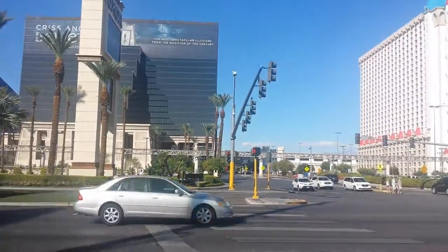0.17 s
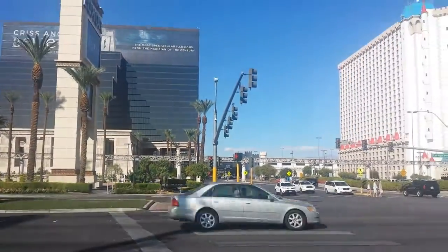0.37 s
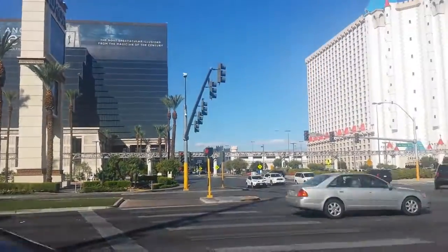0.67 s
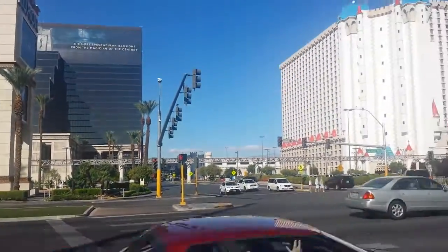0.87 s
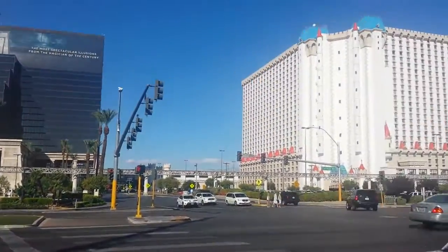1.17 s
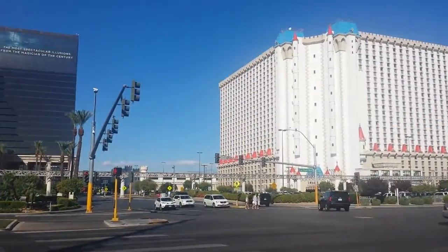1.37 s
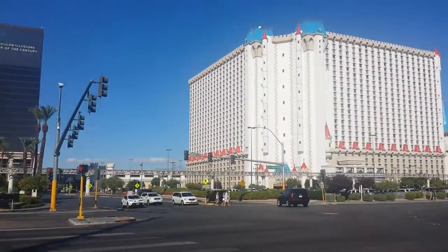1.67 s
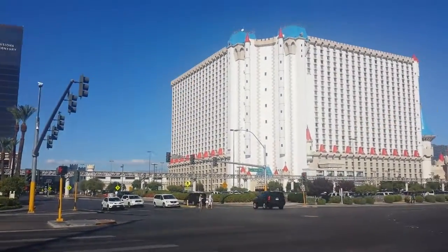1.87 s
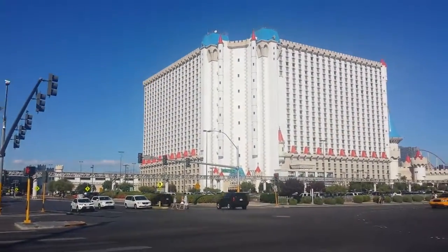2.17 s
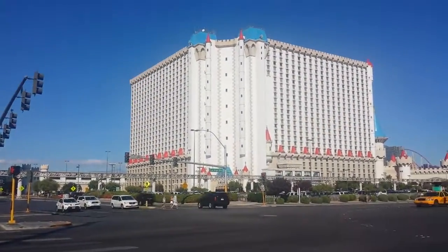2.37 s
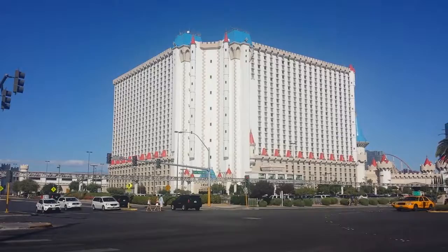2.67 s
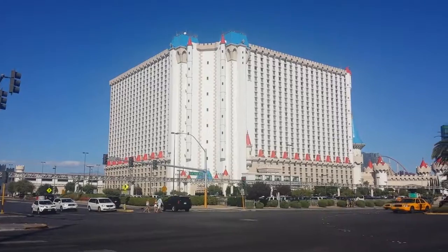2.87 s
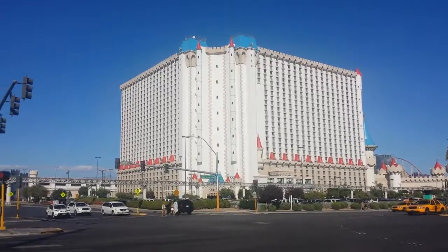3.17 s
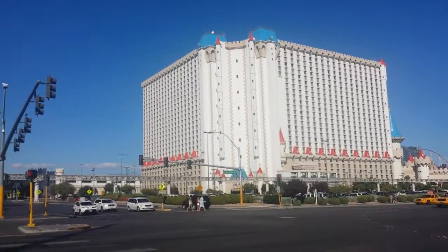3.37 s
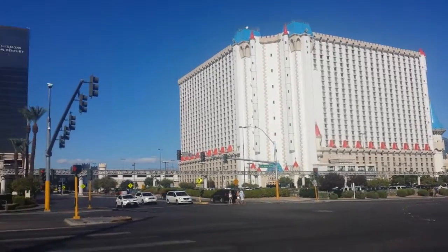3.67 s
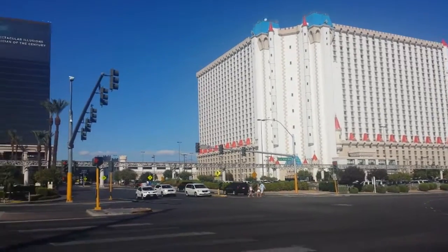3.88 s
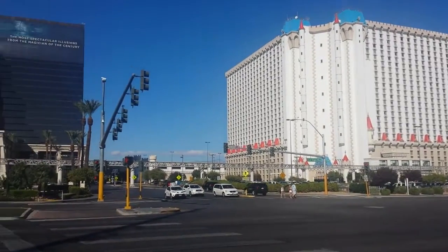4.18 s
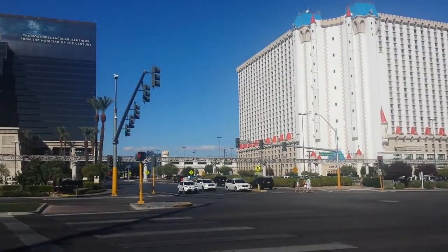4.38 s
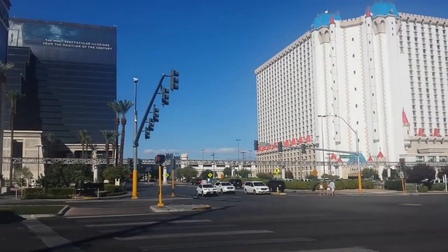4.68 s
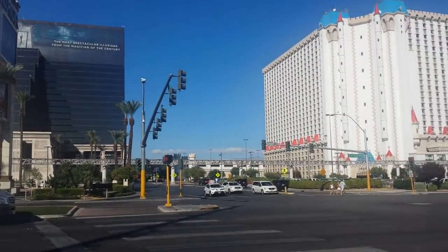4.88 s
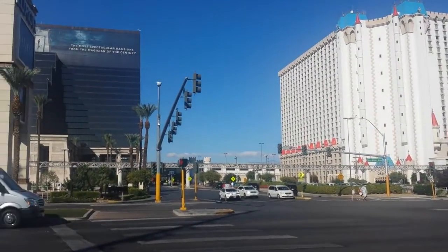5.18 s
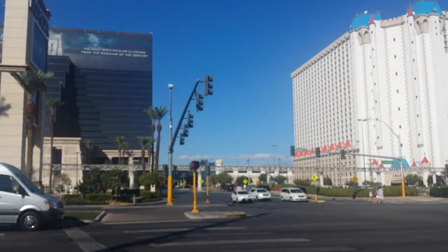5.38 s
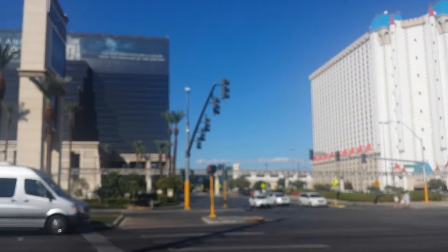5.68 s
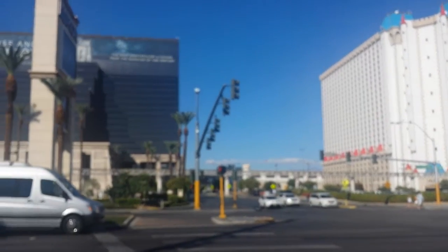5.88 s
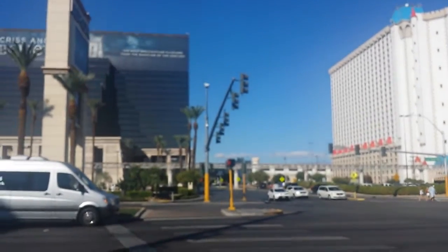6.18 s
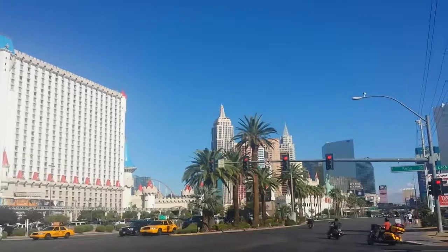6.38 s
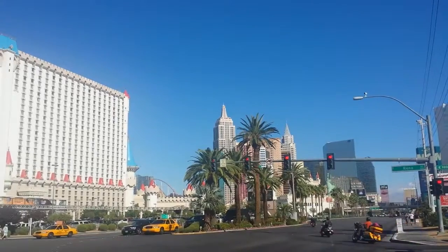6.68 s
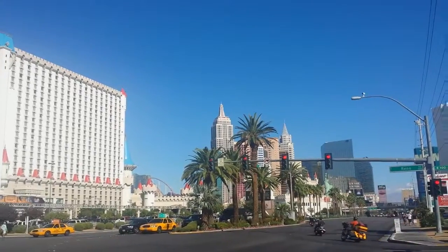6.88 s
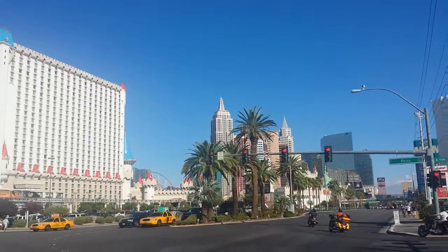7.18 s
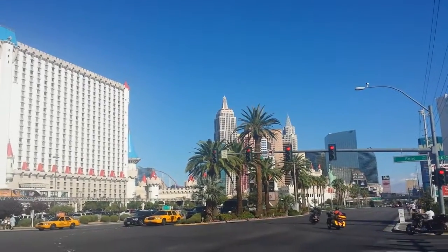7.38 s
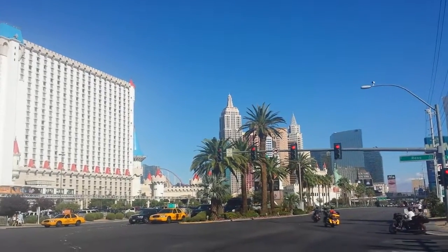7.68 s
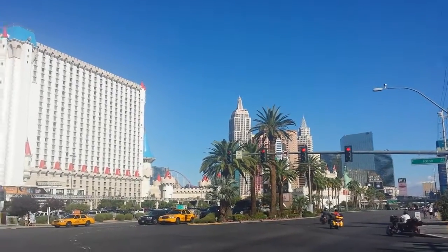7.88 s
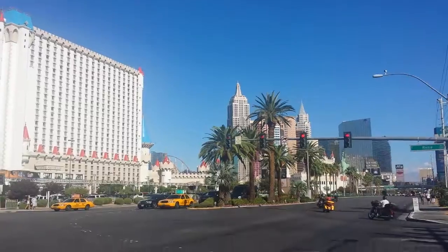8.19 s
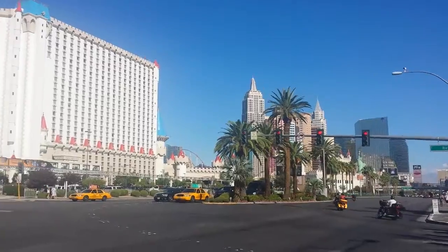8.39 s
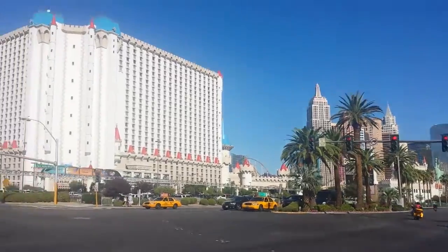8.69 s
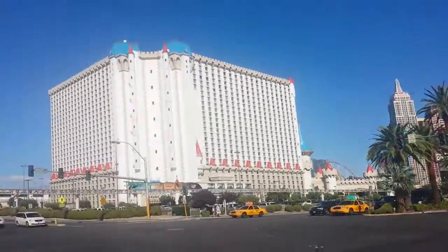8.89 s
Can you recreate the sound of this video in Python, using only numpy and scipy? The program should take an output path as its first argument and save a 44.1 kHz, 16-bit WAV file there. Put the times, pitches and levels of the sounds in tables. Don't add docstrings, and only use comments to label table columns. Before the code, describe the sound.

Kerbside stereo phone pickup, bright but without the highest treble. Close tyre rush swells and drops quickly, its bearing swinging across, with quick thuds over road joints. Distant multi-lane traffic remains under a faint high scrape, a low idling drone and piercing brakes that chirp and sag. After a sudden cut, lumpy twin-cylinder motorbikes dominate, popping and rattling in rapid succession, the last one growing loudest at the end.

```python
import sys
import numpy as np
from scipy import signal
from scipy.fft import rfft, irfft, next_fast_len
from scipy.io import wavfile
from scipy.ndimage import uniform_filter1d, map_coordinates

SR = 44100
rng = np.random.default_rng(int(sys.argv[2]) if len(sys.argv) > 2 else 0)


def dump_mix(stems):
    frames = np.atleast_2d(stems).T
    limited = np.clip(frames, -1, 1)
    pcm = np.round(limited * 32767).astype(np.int16)
    wavfile.write(sys.argv[1], SR, pcm)


def rack_gain(trim_db):
    fader = np.asarray(trim_db, float)
    return 10 ** (fader / 20)


N = 398663
TIME = np.arange(N) / SR
CUT_S = 6.243

# t/s, lag of the left port/ms
BEARING = [(0, 0.4), (.8, 0.34), (1.05, 0.0065), (1.3, -0.24), (3.6, -0.3)]
# t/s, peak
# level/dB, jet f/Hz
FIRST_BIKE_FIRINGS = [(6.2618, -13.5, 6410), (6.3152, -14.5, 5830), (6.345, -15, 6640),
                      (6.3681, -13.5, 5700), (6.4, -21, 7650), (6.4204, -25, 5750), (6.4514, -21, 7280),
                      (6.4716, -16, 5360), (6.5023, -23, 5400), (6.5237, -18, 5360), (6.5736, -18, 7950),
                      (6.606, -18, 7250), (6.626, -15, 7300), (6.6549, -21, 5830), (6.6609, -27, 7780),
                      (6.676, -20, 5330)]
SECOND_BIKE_FIRINGS = [(6.6764, -22, 5230), (6.7086, -21, 7380), (6.7741, -23, 5430), (6.7911, -18.5, 7500),
                       (6.826, -22, 7810), (6.8739, -19, 8000), (6.9088, -17.5, 5430), (6.9567, -18, 7970),
                       (6.9911, -17.5, 7700), (7.037, -17, 8000), (7.073, -26, 7680), (7.0733, -20, 7990),
                       (7.1186, -15, 8000), (7.1533, -17, 8140), (7.198, -22, 6160), (7.1992, -17.5, 7620),
                       (7.2331, -17.5, 7400), (7.279, -16, 8220), (7.3139, -16, 7880), (7.3495, -22, 5750),
                       (7.3588, -17, 8200), (7.3942, -19.5, 8030), (7.4406, -17, 7250), (7.475, -20, 6110),
                       (7.5209, -19, 8090), (7.5559, -18, 5590), (7.6003, -20, 7950), (7.6626, -22, 7510),
                       (7.6781, -22, 8300), (7.7075, -17, 5310), (7.7532, -18, 8200), (7.787, -19.5, 8100),
                       (7.8193, -23, 7420), (7.8302, -17, 8280), (7.8637, -19, 7480), (7.906, -17, 7840),
                       (7.9195, -16.5, 7560), (7.9614, -17, 5360), (7.9789, -24, 7420), (8.0098, -16, 7600),
                       (8.0508, -15, 5210), (8.0822, -24, 7740), (8.1082, -16, 7600), (8.148, -22, 7900),
                       (8.1999, -20, 4870), (8.2002, -19, 7700), (8.2243, -25, 8230), (8.2388, -19, 6430),
                       (8.263, -18, 8250), (8.2924, -16, 7500), (8.3308, -15.5, 7400)]
THIRD_BIKE_FIRINGS = [(8.3808, -15.5, 5730), (8.4017, -22, 8090), (8.4195, -17, 5600), (8.4684, -14, 5160),
                      (8.508, -21, 4500), (8.507, -17, 5920), (8.536, -21, 5530), (8.5569, -13, 6050),
                      (8.5932, -12.5, 6180), (8.6314, -19, 5750), (8.6402, -13.5, 6140),
                      (8.6696, -16, 7500), (8.6773, -14, 7340), (8.6971, -19, 5510), (8.725, -9, 6940),
                      (8.7622, -13, 6900), (8.7987, -21, 5540), (8.8073, -13.5, 5000), (8.8278, -22, 5680),
                      (8.843, -14.5, 6600), (8.887, -13.5, 7440), (8.921, -12, 7300), (8.966, -12.5, 7450),
                      (8.9978, -13, 7270)]


def unit(x):
    return x / np.sqrt(np.mean(x ** 2) + 1e-20)


def along(points, hz):
    f, v = np.transpose(points)
    return np.interp(np.log(hz + 1), np.log(f + 1), v)


def curves(rows):
    s, *cols = np.transpose(rows)
    return [np.interp(TIME, s, c) for c in cols]


def during(rows, fade):
    return np.clip(np.minimum(TIME - rows[0][0], rows[-1][0] - TIME) / fade, 0, 1)


def wobble(rate):
    return map_coordinates(rng.standard_normal(int(N * rate / SR) + 4), [TIME * rate])


def filtered(x, response):
    m = next_fast_len(N + 8192)
    return irfft(rfft(x, m) * response(np.fft.rfftfreq(m, 1 / SR)), m)[..., :N]


def resonances(modes):
    def response(f):
        return sum((-1) ** k * rack_gain(db) * 1j * f * width / (centre * centre - f * f + 1j * f * width)
                   for k, (centre, width, db) in enumerate(modes))
    return response


def ports(x, lag_ms):
    half = np.asarray(lag_ms) * SR / 2000
    return np.array([map_coordinates(x, [np.arange(N) + side * half], order=3) for side in (-1, 1)])


def rush(spectrum, lag_ms, aimed, patchy_db):
    z = signal.stft(rng.standard_normal((3, N)), nperseg=512)[2]
    field = rng.standard_normal(z.shape[1:])
    field = uniform_filter1d(uniform_filter1d(field, size=6, axis=0), size=12, axis=1)
    noise = signal.istft(z * rack_gain(patchy_db * unit(field)), nperseg=512)[1][:, :N]
    port_gap_ms = 0.25

    def response(hz):
        turn = np.arccos(np.sinc(2 * hz * port_gap_ms / 1000)) / 2
        return rack_gain(along(spectrum, hz)) * [hz * 0 + 1, np.cos(turn), np.sin(turn)]

    beam, mid, side = filtered(noise, response)
    aimed = np.clip(aimed, 0, 1)
    around = np.array([mid + side, mid - side])
    return unit(np.sqrt(aimed) * ports(beam, lag_ms) + np.sqrt(1 - aimed) * around)


def tone(hz, orders, unsteady_hz, flutter_db, beads=25):
    phase = 2 * np.pi * np.cumsum(hz + unsteady_hz * wobble(60)) / SR
    return sum(np.sqrt(2) * rack_gain(db + flutter_db * wobble(beads)) * np.sin(k * phase) for k, db in orders)


def passing(closest, coming, going, fall):
    return (1 + ((TIME - closest) / np.where(TIME < closest, coming, going)) ** 2) ** (-fall / 2)


def passing_cars():
    # closest t/s, coming/s, going/s, tyre level/dB, tread hiss level/dB
    cars = [
        (.6, 0.56, 0.21, -18, -24.5),
        (.82, 0.075, 0.1, -15, -25),
        (1.82, 0.99, .6, -25.5, -39.5),
    ]
    # f/Hz, level/dB per Hz
    tyre_colours = [
        [(180, -28), (300, -6.5), (573, -4), (676, 1.5), (1150, -6.5), (1590, -1), (2180, -9.5), (2570, -21.5),
         (3500, -18.5), (4550, -53), (7700, -120)],
        [(180, -41), (300, -40), (528, -11.5), (683, -0.5), (883, 3.5), (1270, -7), (1570, -20), (2030, -7.5),
         (2680, -33.5), (3060, -17), (3500, -35), (4550, -22), (7700, -120)],
    ]
    # f/Hz, level/dB per Hz
    tread_colour = [(1650, -6), (2800, 1.5), (3510, -3.5), (4950, -5.5), (6780, 5), (9170, -8.5),
                    (11000, -32), (12400, -38), (14200, -30), (15000, -38)]
    # t/s, firing f/Hz, level/dB
    exhaust = [(0, 89, -48), (.07, 85.9, -30), (.4, 86.8, -28), (.76, 98.9, -27), (.86, 99.9, -23.5),
               (1.05, 104.3, -20.5), (1.55, 105.8, -23), (1.7, 103.4, -29), (2.2, 101.8, -31)]
    # multiple of firing f, level/dB
    exhaust_orders = [(1, 0), (1.5, -12), (2, -9), (2.25, -8), (3, -15)]
    tyre_fall, tread_fall, gone_s = 0.85, 1.7, 4.44

    first, *others = (rack_gain(db) * passing(*move, tyre_fall) for *move, db, _ in cars)
    tread = np.sqrt(sum((rack_gain(db) * passing(*move, tread_fall)) ** 2 for *move, _, db in cars))
    lag_ms, = curves(BEARING)
    bumps = wobble(34.8)
    roar = first * rush(tyre_colours[0], lag_ms=0.4, aimed=0.51, patchy_db=1.0)
    near_roar = rush(tyre_colours[1], lag_ms, aimed=0.81, patchy_db=2.0)
    roar += np.hypot(*others) * rack_gain(0.59 * bumps) * near_roar
    hiss = tread * rack_gain(0.8 * bumps) * rush(tread_colour, lag_ms, aimed=0.4, patchy_db=0.9)
    hz, db = curves(exhaust)
    note = tone(hz, exhaust_orders, unsteady_hz=0.93, flutter_db=0.6)
    note = during(exhaust, 0.038) * rack_gain(db - 1.5) * note
    return np.clip(gone_s - TIME, 0, 1) * (roar + hiss) + ports(note, lag_ms)


def grooves():
    # closest t/s, coming/s, going/s, level/dB, f/Hz, width/Hz
    flashes = [
        (.73, 0.24, 0.11, -28.5, 2240, 465),
        (1.046, 0.31, 0.082, -25, 1590, 450),
        (0.785, 0.1, 0.1, -24, 820, 210),
        (0.93, 0.24, 0.19, -38.5, 10700, 2000),
        (0.95, 0.15, 0.11, -25.5, 6660, 1300),
        (3.6, 0.028, .03, -49, 6100, 1100),
        (4.29, 0.09, 0.041, -43, 5200, 1500),
    ]
    lag_ms, = curves(BEARING)

    def band(hz, width):
        response = resonances([(hz, width, 0)])
        return unit(filtered(rng.standard_normal(N), lambda f: response(f) ** 2))

    return sum(ports(rack_gain(db) * passing(*move, 1.6) * band(hz, width), lag_ms)
               for *move, db, hz, width in flashes)


def joints():
    # t/s, peak level/dB
    slaps = [(0.79, 3), (0.812, 2), (0.851, -5), (0.905, -18), (0.945, -6), (0.986, 0.5), (1.059, -15),
             (1.11, -1), (1.408, -4)]
    # f/Hz, width/Hz, level/dB
    cavity = [(830, 140, 8.5), (2030, 820, -5)]
    out, t = np.zeros(N), np.arange(900) / SR
    for s, db in slaps:
        burst = 1.1 * rng.standard_normal(len(t)) - 0.98 * np.cos(2 * np.pi * 900 * t)
        out[round(s * SR):][:len(t)] += rack_gain(db - 60 * t / 0.0062) * burst
    rung = filtered(out, lambda f: resonances(cavity)(f) / (1 + 1j * f / 4000) ** 2)
    return ports(rung, curves(BEARING)[0])


def motorbikes():
    # t/s, engine cycle f/Hz
    cranks = [
        [(6.19, 18.769), (6.95, 20.746)],
        [(6.18, 10.804), (6.9, 12.312), (7.5, 12.62), (8, 13.6), (8.5, 14.3), (9.06, 15)],
        [(7.5, 9.295), (9.13, 12.991)],
    ]
    starts = [-.02, -.032, -.101]
    # t/s, level/dB
    throttles = [
        [(6.2, -30.5), (6.45, -31), (6.7, -38), (6.95, -23)],
        [(6.2, -36), (6.6, -33.5), (7.2, -38), (7.5, -31), (8, -31.5), (8.4, -31), (8.7, -44), (9.05, -36)],
        [(7.55, -60), (7.9, -38), (8.2, -37), (8.45, -32.5), (8.57, -28), (8.75, -29.5), (9.1, -30.5)],
    ]
    # thump level/dB at a nearness of -31.5 dB, growth/dB per dB
    thumps = [(-22, 1), (-22, 1), (-26, 2.5)]
    pipes = [
        [3, 4, 5, 6, 7, 9, 10, 12],
        [5, 6, 7, 9, 12, 16, 19, 21, 23, 28, 37],
        [5, 7, 9, 10, 12, 16, 18, 25, 26],
    ]
    pipe_levels = [
        [-8, -11, 10, -6, 9, -15, -21, -4],
        [-4, -5, 0, 6, -1, 3, -6, 2, -12, -10, -11],
        [0, 8, 7, -16, -12, -3, -6, -3, -9],
    ]
    # f/Hz, width/Hz, level/dB
    mouths = [
        [(1290, 520, -17), (2900, 430, -2), (5500, 430, 5), (7550, 1440, -1.5)],
        [(1280, 420, -9), (2760, 1100, 2), (5530, 800, 3), (8030, 970, 1)],
        [(1920, 240, 2), (2960, 2500, -1), (5570, 1700, 1.5), (7780, 1060, 4)],
    ]
    lags = [-0.228, -0.13, -0.17]
    blast_levels = [-7, -3.5, -5.5]
    jet_levels = [-5, -5.5, -7]
    # delay/s, level/dB
    walls = [(.0098, -16), (.021, -38), (.034, -9), (.055, -10.5)]
    firing_tables = (FIRST_BIKE_FIRINGS, SECOND_BIKE_FIRINGS, THIRD_BIKE_FIRINGS)

    out, t = np.zeros((2, N)), np.arange(700) / SR
    shape = (1 - np.exp(-t / 0.0009)) * np.exp(-t / 0.0022)
    for crank, start, throttle, (thump_db, growth), orders, orders_db, mouth, lag_ms, firings, blast_db, jet_db in zip(
            cranks, starts, throttles, thumps, pipes, pipe_levels, mouths, lags,
            firing_tables, blast_levels, jet_levels):
        thump = pipe_thump(crank, start, zip(orders, orders_db))
        sounding = np.sqrt(N / SR / (crank[-1][0] - crank[0][0]))
        near_db, = curves(throttle)
        thump = rack_gain(thump_db + growth * (near_db + 31.5)) * unit(thump) / sounding
        crack = gas_blasts(firings, blast_db, shape, mouth)
        for _ in range(2):
            crack = crack + rack_gain(jet_db) * jets(firings, shape)
        out += ports(thump + crack, lag_ms)
        for k, (delay, db) in enumerate(walls):
            out += rack_gain(db) * ports(np.roll(crack, round(delay * SR)), (-1) ** k * 0.317)
    return out * (TIME >= CUT_S)


def pipe_thump(crank, start, pipe):
    second_cylinder = 0.4375
    cycles = start + np.cumsum(curves(crank)[0] * (during(crank, 1) > 0)) / SR
    thump = np.zeros(N)
    for k, db in pipe:
        phase = np.angle(1 + np.exp(-2j * np.pi * k * second_cylinder))
        thump -= rack_gain(db + 1.5 * wobble(12)) * np.cos(2 * np.pi * k * (cycles + 0.016) + phase)
    return thump * during(crank, 0.12)


def gas_blasts(firings, blast_db, shape, mouth):
    s, peak_db, _ = np.transpose(firings)
    puffs = np.bincount(np.round(s * SR).astype(int), rack_gain(peak_db + blast_db), minlength=N)[:N]
    blast = signal.fftconvolve(puffs, shape)[:N]
    gas = rng.standard_normal(N)
    crack = filtered(blast * gas, lambda f: resonances(mouth)(f) / (1 + 1j * f / 12000))
    return crack / np.std(filtered(gas, resonances(mouth))) * 2


def jets(firings, shape):
    width_hz = 990
    s, db, hz = np.transpose(firings)[..., None]
    t = np.arange(len(shape)) / SR
    band = np.exp(-np.pi * width_hz * t) * t * np.sin(2 * np.pi * hz * t)
    gas = rng.standard_normal((len(s), len(t))) * shape
    jet = signal.fftconvolve(gas, band, axes=1)[:, :len(t)]
    jet *= rack_gain(db) / np.abs(jet).max(axis=1, keepdims=True)
    at = np.round(s * SR).astype(int) + np.arange(len(t))
    return np.bincount(at.ravel(), jet.ravel(), minlength=N)[:N]


def knocks():
    # t/s, peak level/dB, f/Hz
    rattles = [(6.2798, -12, 3140), (6.3401, -23, 2670), (6.401, -21, 2480), (6.5157, -20, 2900),
               (6.5731, -18.5, 3220), (6.7073, -24, 2830), (6.7417, -15, 2600), (6.7971, -11, 2760),
               (6.828, -24, 2520), (6.852, -19, 2780), (6.8814, -22, 2340), (6.9582, -19, 2360),
               (7.1538, -23, 2240), (7.1997, -23, 2600), (7.2795, -24, 3010), (7.3119, -23, 2370),
               (7.3583, -21, 2500), (7.3942, -20, 3290), (7.4406, -12, 2870), (7.5209, -22, 2620),
               (7.5539, -25, 2180), (7.6003, -22, 3370), (7.6531, -18, 2700), (7.7125, -23, 2800),
               (7.728, -10, 2750), (7.7734, -22, 2100), (7.8627, -23, 2360), (7.8791, -13, 2650),
               (7.947, -17, 2670), (8.0058, -16, 2290), (8.1076, -20, 2620), (8.359, -18, 2080),
               (8.3825, -24, 2600), (8.5077, -20, 2220), (8.8868, -25, 2140), (8.9228, -23, 3130),
               (8.9657, -19.5, 2250), (8.9986, -16, 3170)]
    # t/s, peak level/dB, f/Hz
    clunks = [(6.5282, -24, 1340), (6.648, -21, 1290), (6.8265, -22, 1330), (7.038, -15, 1280),
              (7.1154, -22, 1620), (7.153, -19, 1280), (7.316, -17, 1280), (7.44, -22, 1070),
              (7.5559, -24, 1080), (7.5993, -23, 1200), (7.707, -20, 1560), (7.7945, -15, 1620),
              (7.8367, -16, 1800), (7.8607, -23, 1130), (7.8801, -22, 1150), (8.67, -18, 1470)]
    # t/s, peak level/dB, f/Hz
    clacks = [
        (5.596, -21, 1400),
        (5.761, -16, 2300),
    ]
    out, t = np.zeros(N + 900), np.arange(900) / SR
    for s, db, hz in [*rattles, *clunks, *clacks]:
        ring = np.sin(2 * np.pi * hz * t) + 0.5 * rng.standard_normal(len(t)) * rack_gain(-60 * t / 0.006)
        swell = np.exp(-t * hz / 4) * (1 - np.exp(-t / 0.00048))
        out[round(s * SR):][:len(t)] += rack_gain(db + 0.5) * swell * ring
    return ports(filtered(out[:N], lambda f: 1 / (1 + 1j * f / 5000) ** 2), lag_ms=-0.0072)


def squeals():
    # start t/s, length/s, level/dB, octave level/dB
    disc_grabs = [(2.12, 0.063, -40.5, -52), (2.16, 0.1, -46, -39), (2.27, 0.1, -40, -43),
                  (2.38, 0.059, -41, -60), (2.44, 0.059, -35, -58), (3.47, 0.073, -45, -67),
                  (3.505, 0.11, -29, -66), (3.62, 0.043, -35, -70), (3.66, .05, -48, -63),
                  (3.83, 0.071, -35, -60), (3.89, 0.091, -27, -48), (3.98, 0.087, -32, -48),
                  (4.03, 0.075, -28, -49), (4.08, 0.073, -23.5, -53), (4.105, 0.037, -37, -34),
                  (4.15, 0.064, -32, -45), (4.19, 0.056, -25, -51), (4.23, .06, -29, -51),
                  (4.265, 0.031, -30, -33), (4.28, 0.1, -18.5, -38.5), (4.375, 0.044, -34, -37),
                  (4.42, 0.11, -27, -42), (4.54, 0.035, -44, -38), (4.575, 0.039, -37, -38),
                  (4.59, 0.11, -31.5, -46), (4.655, .085, -47, -37.5), (4.71, 0.021, -31, -45),
                  (4.74, 0.095, -38, -41), (4.78, 0.17, -32, -46), (4.83, .07, -43, -52),
                  (4.92, .04, -41, -48), (4.955, 0.17, -33.5, -55), (5.09, 0.073, -31, -50),
                  (5.14, .14, -31, -53), (5.26, .08, -35, -57), (5.32, 0.073, -28.5, -42),
                  (5.405, 0.044, -29, -45), (5.445, 0.043, -27.5, -44), (5.49, 0.057, -33, -45),
                  (5.545, 0.086, -37, -43), (5.64, 0.092, -43, -40), (5.7, 0.1, -32.5, -41),
                  (5.77, 0.22, -34, -50), (5.84, .04, -48, -39), (5.88, .16, -53, -43),
                  (6.005, .04, -42, -48), (6.05, 0.097, -53, -66)]
    # t/s, f/Hz
    disc_hz = [(2, 3878), (3.5, 3912), (3.9, 3902), (4.3, 3870), (4.6, 3826), (4.9, 3809), (5.5, 3803),
               (6, 3825)]
    # start t/s, length/s, level/dB
    pad_grabs = [(1.1, 3.1, -44), (1.11, 0.094, -32), (1.26, 0.18, -32), (1.41, 0.087, -30),
                 (1.51, 0.17, -29.5), (1.68, 0.35, -32), (1.85, 0.36, -36), (2.06, 0.39, -36.5),
                 (2.43, 0.42, -39), (2.86, 0.23, -30), (3.05, 0.18, -29.5), (3.22, 0.16, -40),
                 (3.43, 0.16, -46)]
    # t/s, f/Hz
    pad_hz = [(1.2, 7322), (2.2, 7280), (3, 7230), (3.6, 7212)]
    # start t/s, length/s, level/dB
    drum_grabs = [(4.725, .07, -42), (4.81, 0.034, -41), (4.855, .03, -44), (4.89, .05, -46),
                  (4.95, 0.071, -43), (5.295, .09, -39), (5.8, 0.054, -48), (5.83, 0.11, -27),
                  (5.97, 0.2, -27), (6.13, 0.098, -29)]
    # t/s, f/Hz
    drum_hz = [(4.75, 6865), (5.35, 6815), (6, 6798)]
    # t/s, centre f/Hz, level/dB
    scrape = [(0.85, 10700, -46), (1.2, 10890, -43), (2.62, 10780, -36), (3.7, 10770, -42.5),
              (4.07, 10800, -56), (4.15, 10800, -89)]

    fundamental_db = grabs(disc_grabs, 2) - 4
    octave_db = grabs(disc_grabs, 3) + 3.5
    third_db = 0.4 * grabs(disc_grabs, 2) - 45.5 - 15 * (TIME < 4.06)
    orders = [(1, fundamental_db), (2, octave_db), (3, third_db)]
    disc = tone(*curves(disc_hz), orders, unsteady_hz=7.7, flutter_db=1.5, beads=45)
    pad_db = grabs(pad_grabs, 2) - 2.5
    pad = tone(*curves(pad_hz), [(1, pad_db)], unsteady_hz=9, flutter_db=2.2, beads=57)
    drum_db = grabs(drum_grabs, 2) + 2.5
    drum = tone(*curves(drum_hz), [(1, drum_db)], unsteady_hz=7, flutter_db=1.5, beads=40)
    out = ports(disc, lag_ms=-0.3) + ports((pad + drum) * (TIME < CUT_S), lag_ms=-0.25)

    hz, db = curves(scrape)
    rasp = filtered(rng.standard_normal((2, N)), lambda f: rack_gain(-f * 0.055) + 0.74 * rack_gain(-f * 0.41))
    carrier = np.cos(2 * np.pi * np.cumsum(hz) / SR + np.array([[0], [1.5]]))
    return out + during(scrape, 0.033) * rack_gain(db) * unit(rasp * carrier)


def grabs(rows, column):
    bite = 0.8
    power = 1e-12
    for row in rows:
        start, length = row[:2]
        swell = np.sin(np.pi * np.clip((TIME - start) / length, 0, 1)) ** 2
        power = power + rack_gain(2 * row[column]) * swell ** bite * (TIME < start + length)
    return 10 * np.log10(power)


def grit():
    # t/s, peak level/dB
    cracks = [(2.033, -36), (2.6198, -30), (2.785, -33), (3.135, -31), (3.5994, -34), (3.9094, -24),
              (4.2993, -39)]
    out, t = np.zeros((2, N)), np.arange(900) / SR
    for s, db in cracks:
        out[:, round(s * SR):][:, :len(t)] += rack_gain(db - 5 - 60 * t / 0.05) * rng.standard_normal((2, len(t)))
    return filtered(out, lambda f: resonances([(7000, 5000, 0)])(f) ** 2)


def waiting_engine():
    # t/s, level/dB
    idle = [(2.8, -33.5), (6.2, -38.5)]
    hz = 75.7 + 4.6 * wobble(1.6)
    drone = tone(hz, [(1, 3.0), (2, -29.0)], unsteady_hz=6.5, flutter_db=2.0)
    return during(idle, 0.25) * rack_gain(curves(idle)[0]) * drone


def far_traffic():
    # t/s, flow level/dB
    flows = [
        [(0, -3), (.1, 0), (1.2, 5.5), (2.55, -3), (4.22, -6.5), (4.28, -3), (4.95, -4.5), (5.4, -4),
         (6.24, -3)],
        [(6.25, -0.5), (6.41, -0.5), (7.38, -0.5), (7.7, -.5), (8.35, -0.5), (8.55, -1), (8.8, -1), (9.04, -1)],
    ]
    # level/dB at flow 0, growth/dB per dB of flow
    layer_levels = [
        [(-24, 0.34), (-28.5, 0.04), (-31.5, 1.3)],
        [(-19.5, -0.5), (-27.5, 2.47), (-32, 3.5)],
    ]
    # f/Hz, level/dB per Hz
    rumbles = [
        [(13, -55), (22, -44), (38, -14), (53, -14), (76, -1.5), (141, 2), (167, -2), (312, -3.5), (500, -10.5),
         (650, -29), (1100, -120)],
        [(13, -47), (22, -21), (79, 1), (113, 2), (156, -3.5), (247, -3.5), (390, -17.5), (500, -15),
         (650, -18), (1100, -120)],
    ]
    # f/Hz, level/dB per Hz
    roars = [
        [(180, -12.5), (300, -12), (329, -10.5), (481, -39), (539, -3.5), (683, -6.5), (883, -5.5), (1320, -9),
         (1740, -10.5), (3500, -32.5), (4550, -62), (7700, -120)],
        [(180, -61), (300, -24.5), (404, -33), (462, -22), (683, 0), (901, -7), (1280, -2.5), (1490, -4),
         (2680, -14.5), (3500, -21), (4550, -42), (7700, -120)],
    ]
    # f/Hz, level/dB per Hz
    hisses = [
        [(2440, -2.5), (4150, -9), (5490, -8), (6640, -8.5), (7190, -2.5), (7790, -11), (9200, -22.5),
         (12000, -35), (20200, -120)],
        [(1650, -50), (2800, 5.5), (3270, -1.5), (4570, -4), (5370, 0.5), (6830, -1.5), (7760, 0.5), (8580, -9),
         (10600, -17), (13800, -47), (22000, -120)],
    ]
    views = (TIME < CUT_S, TIME >= CUT_S)

    out = np.zeros((2, N))
    for rows, layers, rumble, roar, hiss, on in zip(flows, layer_levels, rumbles, roars, hisses, views):
        flow_db, = curves(rows)
        rumble_db, roar_db, hiss_db = (db + growth * flow_db for db, growth in layers)
        out += on * rack_gain(rumble_db) * rush(rumble, lag_ms=-0.35, aimed=0.51, patchy_db=1.5)
        out += on * rack_gain(roar_db + chug()) * rush(roar, lag_ms=-0.38, aimed=0.69, patchy_db=1.18)
        out += on * rack_gain(hiss_db + 0.5 * chug()) * rush(hiss, lag_ms=-0.26, aimed=0.27, patchy_db=1.8)
    return out


def chug():
    firings = np.concatenate([FIRST_BIKE_FIRINGS, SECOND_BIKE_FIRINGS, THIRD_BIKE_FIRINGS])
    at = np.round(firings[:, 0] * SR).astype(int)
    half_s = 0.006
    swell = np.convolve(np.bincount(at, minlength=N), np.hanning(round(2 * half_s * SR)))[:N]
    return 5 * np.clip(swell, 0, 1)


def scene():
    cars = passing_cars() + grooves() + joints()
    bikes = motorbikes() + knocks()
    return cars + bikes + squeals() + grit() + waiting_engine() + far_traffic()


def top_cut(x):
    return signal.sosfilt(signal.butter(12, 15310, fs=SR, output="sos"), x)


def record(dry):
    # f/Hz, level/dB
    tilt = [(60, 1), (120, 1), (240, 0), (470, 1.5), (940, -1.5), (1870, 4.5), (3720, 2), (7390, -3.5),
            (14700, -24.5)]
    # f/Hz, level/dB
    top = [(9500, 0), (11000, -0.5), (12500, -10.5), (14600, -3), (15300, -30), (15600, -90)]
    halves = np.array([[0.5], [-0.5]])
    mix = filtered(dry, lambda hz: rack_gain(along(tilt, hz) * halves + along(top, hz)))
    mix = mix / (1 + np.abs(mix / 0.95) ** 6) ** (1 / 6)
    return top_cut(mix)


dry = scene()
out = record(dry)
dump_mix(out)
```